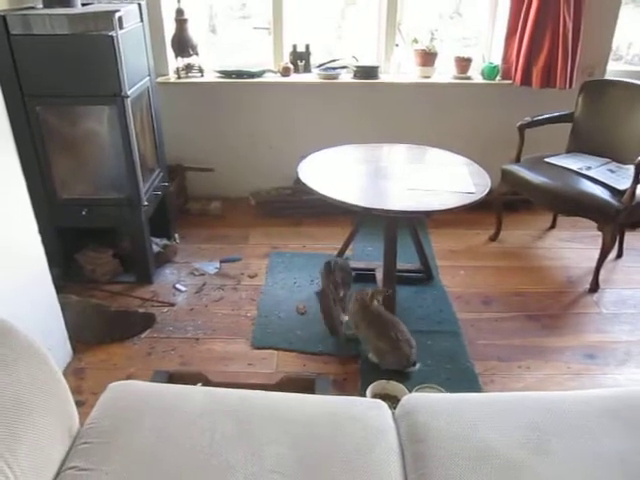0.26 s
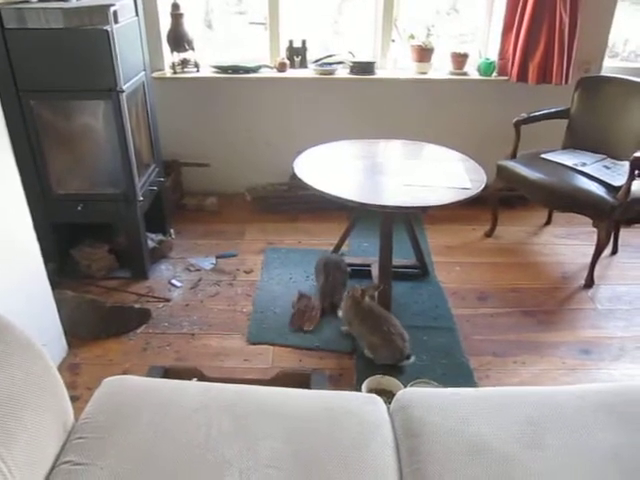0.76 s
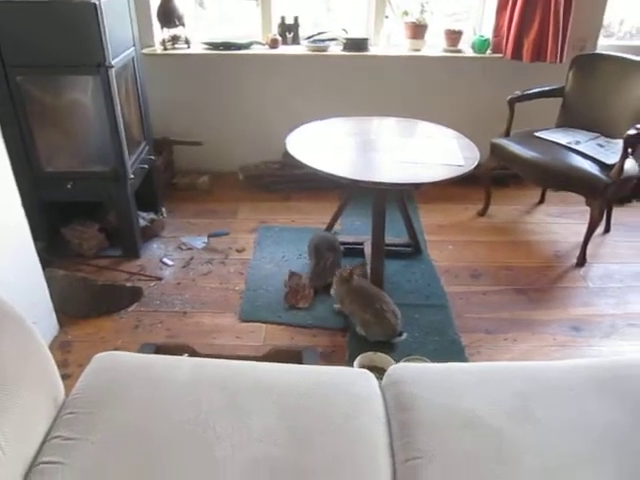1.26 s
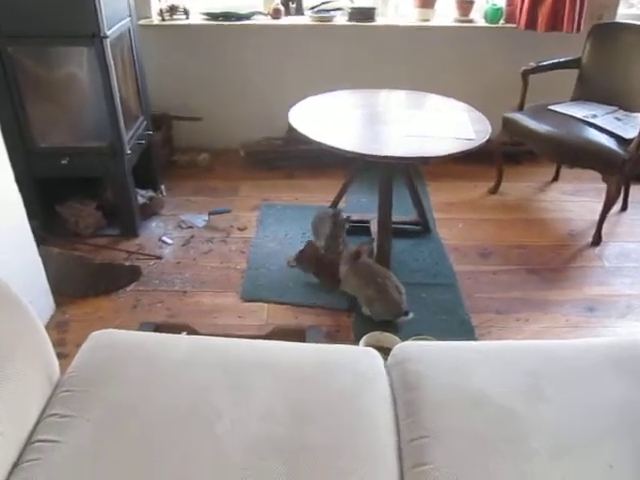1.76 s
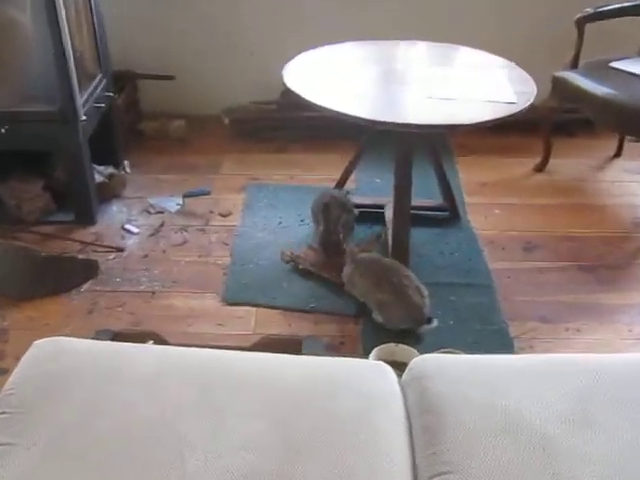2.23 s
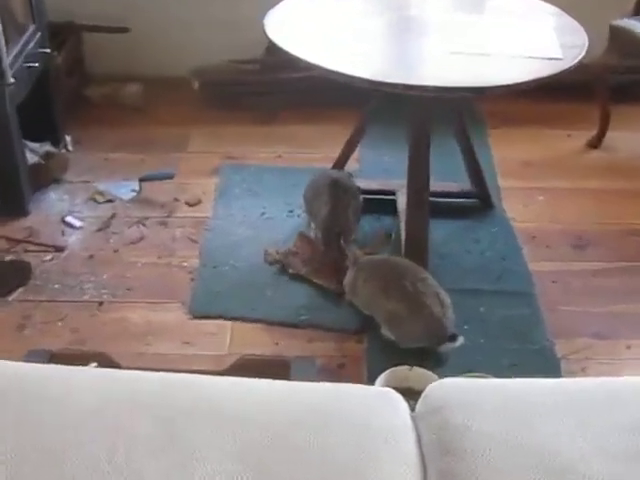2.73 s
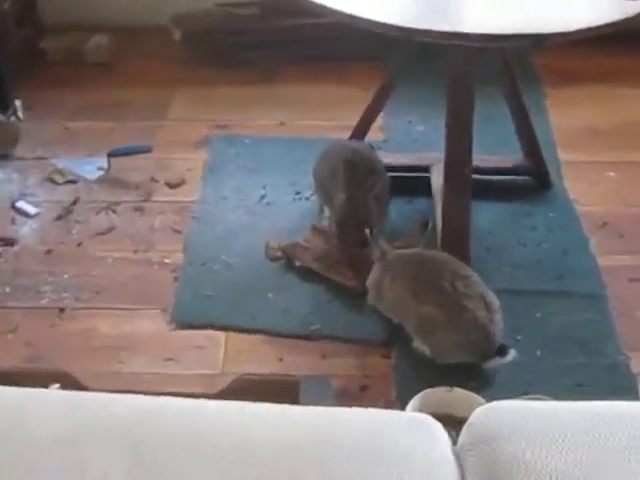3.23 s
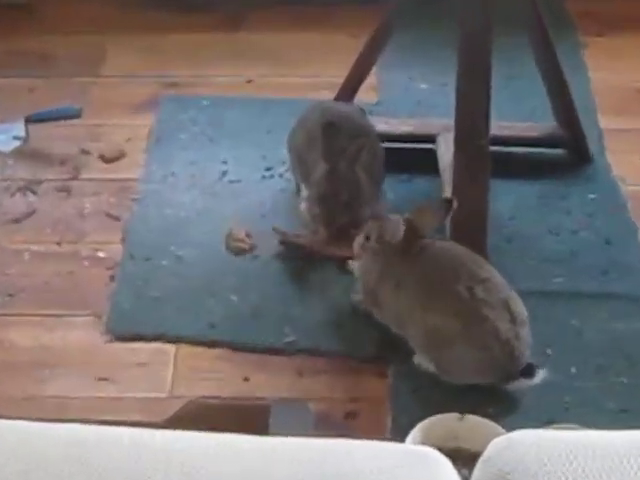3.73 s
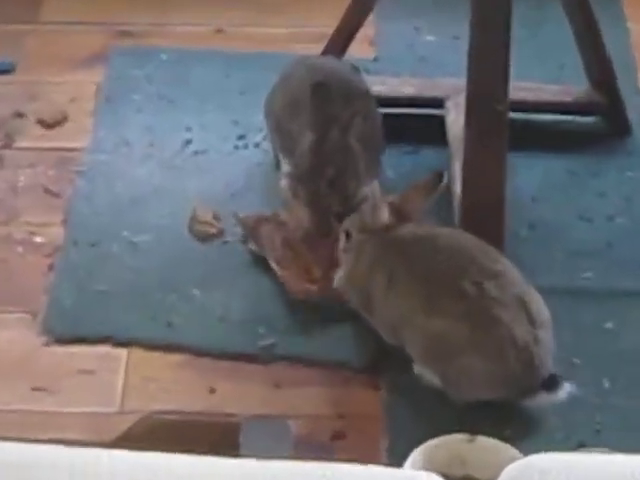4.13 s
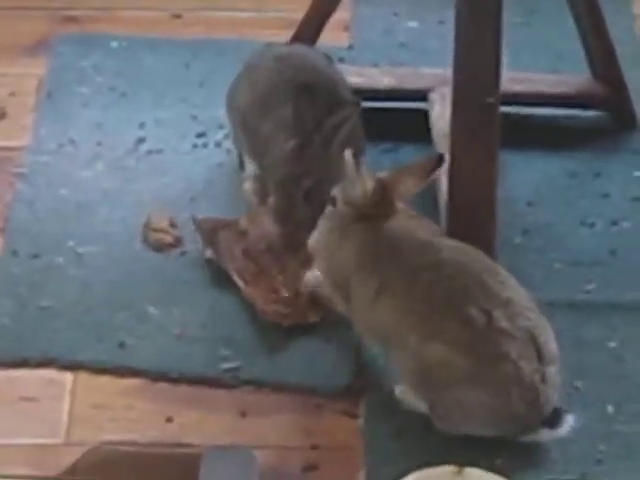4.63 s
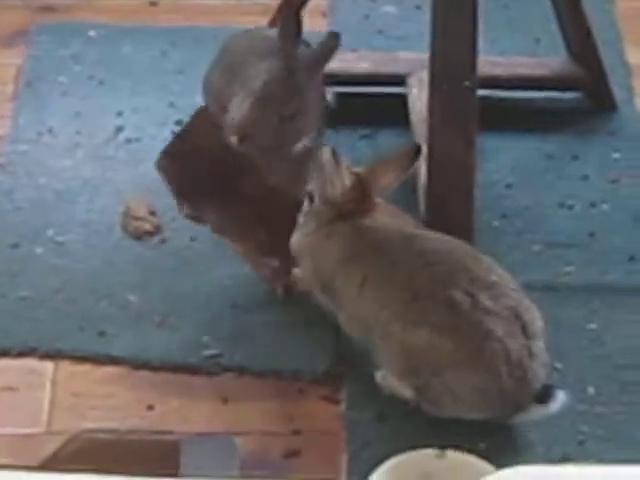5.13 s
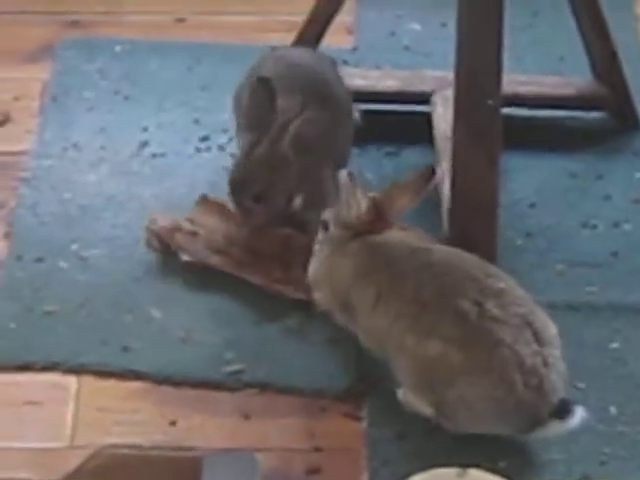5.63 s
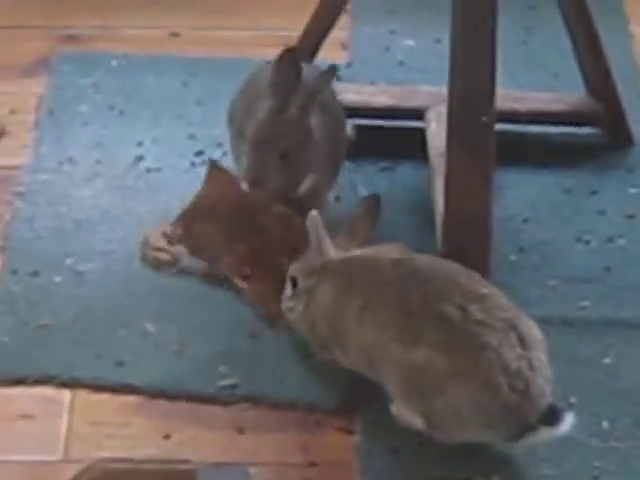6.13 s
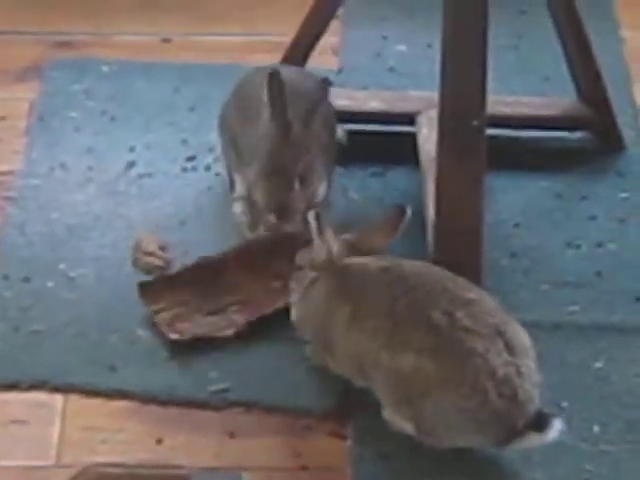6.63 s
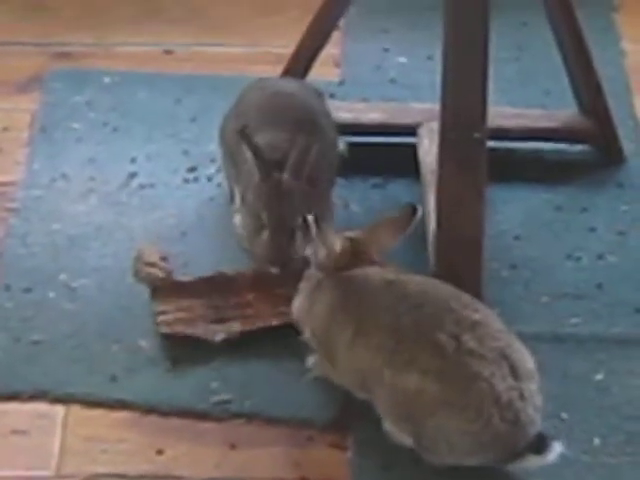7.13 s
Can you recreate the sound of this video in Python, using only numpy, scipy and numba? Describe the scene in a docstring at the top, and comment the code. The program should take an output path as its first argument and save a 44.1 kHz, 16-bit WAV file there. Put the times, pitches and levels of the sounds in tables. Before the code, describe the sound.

Rabbits gnaw and tug a dry bark-like scrap in a living room: irregular crisp cracks, soft floor thumps, and one loud click of the camera case.

```python
"""A dry, bark-like scrap cracks as two rabbits gnaw and tug at it on a rug, a few metres off in a living room.
Each crack is a burst of tiny fractures, shaped noise that rings the scrap and the room.
Paws and the dropped scrap thump the wooden floor: short pushes into decaying board modes.
The hand-held camera whines as a wavering sine, and fingers click its case as dry, ringing noise.
A low hum swells once over rumble and hiss; the hardest click makes the camera's gain control duck."""
import sys
import numpy as np
from scipy import signal
from scipy.fft import rfft, irfft, next_fast_len
from scipy.io import wavfile
from scipy.ndimage import uniform_filter1d
from numba import njit

SR = 44100
rng = np.random.default_rng(int(sys.argv[2]) if len(sys.argv) > 2 else 0)


def generate_wav(signal):
    """Clip the signal to [-1, 1] and save it as 16-bit WAV at the path in sys.argv[1]."""
    frames = np.transpose(np.atleast_2d(signal))
    scaled = np.clip(frames, -1, 1) * 32767
    pcm = np.round(scaled).astype(np.int16)
    wavfile.write(sys.argv[1], SR, pcm)


N = 325458
COUNT = 24000  # samples in one sound event
T = np.arange(COUNT) / SR


def undb(db):
    """Decibels to gain."""
    return 10 ** (np.asarray(db) / 20)


def level(x, db, span=None):
    """Scale x so that its energy, spread over span seconds (or its own length), has this level."""
    samples = span * SR if span else len(x)
    return x * undb(db) / np.sqrt(np.sum(x ** 2) / samples)


def fade(t60):
    """Exponential decay of 60 dB in t60 seconds."""
    return np.exp(-np.log(1000) * T / t60)


def along(points, hz):
    """Read (frequency [Hz], value) points on a log-frequency axis."""
    f, value = np.transpose(points)
    return np.interp(np.log(np.maximum(hz, 1)), np.log(f), value)


def colour(x, points):
    """Causal minimum-phase filter with the given (frequency [Hz], gain [dB]) outline."""
    size = 2 * next_fast_len(len(x))
    freqs = np.arange(size // 2 + 1) * SR / size
    cepstrum = irfft(np.log(undb(along(points, freqs))))
    # folding the cepstrum forward in time makes the filter causal
    cepstrum[1:size // 2] *= 2
    cepstrum[size // 2 + 1:] = 0
    return irfft(rfft(x, size) * np.exp(rfft(cepstrum)))[:len(x)]


def resonate(x, hz, width):
    """One resonance, gain 1 at its centre; width in Hz."""
    return signal.lfilter(*signal.iirpeak(hz, hz / width, fs=SR), x)


def add(track, s, sound):
    """Mix a sound into the track at time s."""
    start = int(s * SR)
    track[start:start + len(sound)] += sound[:N - start]


# reverberation of the room: (frequency [Hz], decay time t60 [s])
ROOM_DECAY = [(200, 0.62), (700, 0.5), (2300, 0.41), (6000, 0.36), (14000, 0.31)]


def room(early_db, early_t60):
    """Quick reflections from floor and furniture, then a tail that loses its treble first."""
    freqs = np.arange(COUNT // 2 + 1) * SR / COUNT
    noise = rfft(rng.standard_normal(COUNT))
    tail = 0
    for k, (_, t60) in enumerate(ROOM_DECAY):
        # overlapping bands: each is full at its own frequency and gone at its neighbours'
        share = along([(row[0], j == k) for j, row in enumerate(ROOM_DECAY)], freqs)
        tail = tail + irfft(noise * share) * fade(t60)
    sparse = rng.random(COUNT) < .08
    early = rng.standard_normal(COUNT) * sparse * fade(early_t60)
    arrival = 1 - np.exp(-T / 0.0014)
    return level(tail * arrival, 0) + level(early * arrival, early_db)


# relative colour of the steady room and microphone noise: (frequency [Hz], gain [dB])
QUIET_COLOUR = [(12, -31.5), (20, 5), (53, -4), (88, -12), (120, -15.5), (347, -23.5), (472, -26.5),
                (1030, -30), (1330, -29), (1810, -33.5), (6010, -40.5), (8410, -42), (9140, -42),
                (9950, -45), (16000, -51.5)]
QUIET_DB = -45  # mean level before the waver


def rumble_and_hiss():
    """Steady noise of room and microphone, low rumble and hiss, whose level wavers a little."""
    waver_db = level(resonate(rng.standard_normal(N), 5, 7.8), 0) * .5
    noise = colour(rng.standard_normal(N), QUIET_COLOUR)
    return level(noise, QUIET_DB) * undb(waver_db)


# thin whine of the camera: (time [s], mean frequency [Hz], peak level [dB])
WHINE_PATH = [(0, 8830, -76), (1.2, 8830, -75), (1.9, 8890, -71), (4.5, 8890, -71), (5.5, 8940, -69.5),
              (5.9, 8905, -69.5), (7.4, 8915, -69.5)]


def camera_whine():
    """A sine glides along the path while its pitch flutters at random into a narrow, unsteady band."""
    times, whine_hz, whine_db = np.transpose(WHINE_PATH)
    t = np.arange(N) / SR
    flutter_hz = 32 * level(uniform_filter1d(rng.standard_normal(N), size=120), 0)
    hz = np.interp(t, times, whine_hz) + flutter_hz
    return undb(np.interp(t, times, whine_db)) * np.sin(2 * np.pi * np.cumsum(hz) / SR)


def low_hum():
    """A faint low sine swells and fades within about half a second."""
    swell = np.hanning(COUNT) * np.sin(2 * np.pi * 199 * T)
    out = np.zeros(N)
    add(out, 3.12, level(swell, -59))
    return out


# colour of the camera body: (frequency [Hz], gain [dB])
CASE_COLOUR = [(100, -2), (300, -11), (620, -20.5), (1200, 3), (1900, 0), (2800, 2), (3700, -0.5),
               (4900, 1), (7000, -0.5), (10000, -4.5), (16000, -9.5)]
# finger clicks on the camera body, level over 5 ms, ring relative to the rattle:
# (time [s], level [dB], rattle length [s], ring frequency [Hz], ring level [dB])
FINGER_CLICKS = [(1.277, -43.5, 0.00022, 3800, -4), (1.5245, -34.5, 0.0021, 3330, 10),
                 (1.583, -34.5, 0.0048, 3940, 0), (1.6839, -23, 0.001, 3820, 26),
                 (3.9229, -28.5, .0005, 6440, -23), (3.9431, -15.5, 0.0013, 1350, -20.5),
                 (3.9446, 0.5, 0.0076, 2600, -20), (4.177, -53, 0.0011, 4200, -4),
                 (4.327, -56, 0.0027, 4800, -1), (4.354, -50.5, 0.001, 4980, -5),
                 (4.546, -49, 0.00092, 3190, 2.5)]
RELEASE_S, RELEASE_SHARE = 0.00012, 0.062  # a longer rattle takes longer to settle
FLEX_DB, FLEX_LIMIT_DB = -6.5, -26  # the case flexes with the push, up to a stop
KNOCK_HZ, KNOCK_DB, KNOCK_T60_S = 169, -5.5, 0.044  # dull knock of the flexing case


def case_flex():
    """The pushed case sways at a low pitch and gives a dull knock."""
    sway = np.sin(2 * np.pi * 55 * T) * fade(0.022)
    knock = resonate(rng.standard_normal(COUNT) * fade(KNOCK_T60_S), KNOCK_HZ, KNOCK_HZ)
    return level(sway, 0) + level(knock, KNOCK_DB)


def camera_clicks():
    """Plastic parts rattle right at the microphone: dry, with a brief ring and a slow flex of the case."""
    out = np.zeros(N)
    for s, db, length, hz, ring_db in FINGER_CLICKS:
        release = RELEASE_S + RELEASE_SHARE * length
        contact = np.exp(-np.maximum(T - length, 0) / release) + undb(-15) * fade(0.023)
        rattle = colour(contact * rng.standard_normal(COUNT), CASE_COLOUR)
        ring = resonate(rattle, hz, hz / 3)
        # a faint, duller answer comes back from the room
        answer = resonate(rng.standard_normal(COUNT) * fade(0.14), 3000, 4500)
        click = level(rattle, 0) + level(ring, ring_db) + level(answer, -25)
        flex_db = min(db + FLEX_DB, FLEX_LIMIT_DB)
        add(out, s, level(click, db, span=1 / 200) + level(case_flex(), flex_db, span=1 / 100))
    return out


# floorboard modes, detuned a little at each blow: (mean frequency [Hz], level [dB], decay time t60 [s])
BOARD_MODES = [(111, -32, 0.14), (138.2, -6, 0.37), (170.6, 5.5, 0.18), (207, 2, 0.176), (246, 0, 0.087),
               (315, -5.5, 0.37), (333.3, -4.5, 0.16)]
# soft blows on the boards, level over 50 ms: (time [s], level [dB], contact time [s])
FLOOR_THUMPS = [(.211, -31, 0.0019), (.232, -33.5, 0.0024), (.25, -39, 0.0011), (.284, -49, 0.0018),
                (0.672, -36.5, 0.0046), (1.401, -46.5, 0.0034), (1.889, -46, 0.004), (1.925, -43.5, 0.0058),
                (5.054, -52, 0.0009), (5.345, -44.5, 0.0012), (5.42, -47.5, 0.0018), (6.622, -39.5, 0.0035),
                (6.647, -43, 0.0056)]


def floorboards():
    """Paws and the falling scrap push the boards through the rug; a longer contact sounds duller."""
    out = np.zeros(N)
    # the boards radiate little below their lowest mode
    radiation = signal.butter(2, 110, "high", fs=SR, output="sos")
    for s, db, contact in FLOOR_THUMPS:
        push = np.sin(np.pi * np.minimum(T / contact, 1))
        ring = 0
        for mean_hz, mode_db, t60 in BOARD_MODES:
            hz = mean_hz * (1 + 0.032 * rng.standard_normal())
            ring = ring + undb(mode_db) * fade(t60) * np.sin(2 * np.pi * hz * T)
        blow = signal.sosfilt(radiation, signal.fftconvolve(push, ring)[:COUNT])
        echo = signal.fftconvolve(blow, room(early_db=4.5, early_t60=0.27))[:COUNT]
        add(out, s, level(level(blow, 0) + level(echo, -2), db, span=1 / 20))
    return out


def fractures(length, per_s, scatter_db):
    """Strength of a run of tiny breaks, of very unequal size, that swells and dies within length seconds."""
    count = 6 + int(per_s * length)
    place = rng.random(count)
    size = undb(scatter_db * np.minimum(rng.exponential(size=count), 3.5))
    swell = .3 + np.sin(np.pi * place)
    energy = np.zeros(COUNT)
    np.add.at(energy, (place * length * SR).astype(int), (size * swell) ** 2)
    # each break snaps for a fraction of a millisecond
    snaps = np.sqrt(signal.lfilter([1], [1, -np.exp(-1 / (0.00017 * SR))], energy + 1e-18))
    # the torn faces rub harder through the run, then on as the grip lets go
    rub = np.minimum(T / length, 1) * np.exp(-np.maximum(T - length, 0) / 0.0036)
    return np.hypot(level(snaps, 0), level(rub, -8.5))


# mean colour of a fracture: (frequency [Hz], gain [dB])
FRACTURE_COLOUR = [(150, -25), (300, -9), (500, -4.5), (800, -0.5), (1150, -0.5), (2000, 0.5), (3500, -2),
                   (6000, -2.5), (8000, -6), (10000, -16.5), (12500, -15), (16000, -28)]


def crunch(paths, db, length, body_db, air_db, ring_hz, ring_db):
    """A run of breaking fibres, heard directly and by way of the room, through one resonance of the scrap."""
    strength = fractures(length, per_s=1200, scatter_db=5.5)
    # the rough sheet radiates a different crackle in each direction, and each takes its own way round the room
    reflected = 0
    for path in paths:
        crackle = strength * rng.standard_normal(COUNT)
        reflected = reflected + signal.fftconvolve(crackle, path)[:COUNT]
    direct = strength * rng.standard_normal(COUNT)
    sound = level(reflected, 0) + level(direct, -2.5)
    sound = sound + (undb(ring_db) - 1) * resonate(sound, ring_hz, ring_hz / 4.7)
    sound = level(colour(sound, FRACTURE_COLOUR), db, span=1 / 20)
    # body weights the low and middle range, air the top
    return colour(sound, [(800, body_db), (2000, body_db), (3800, 0.0037), (7500, 0.0018), (12000, air_db)])


# modes of the whole scrap: (frequency [Hz], filter width [Hz], level [dB], decay time t60 [s])
SHEET_MODES = [(528, 84, -5, 0.25), (806, 170, -2, 0.12), (2400, 530, -4, 0.15), (6050, 760, 2, 0.21),
               (7160, 1400, 4.5, 0.1)]


def sheet_ring(db):
    """A clean snap rings the stiff sheet; the room blurs each mode into a narrow band."""
    ring = 0
    for hz, width, mode_db, t60 in SHEET_MODES:
        burst = rng.standard_normal(COUNT) * fade(t60)
        band = resonate(resonate(burst, hz, width), hz, width)
        ring = ring + level(band, mode_db)
    return level(ring, db, span=1 / 20)


# In the next three tables level is over 50 ms, before the body and air tilt.
# teeth break the edge of the scrap:
# (time [s], level [dB], length [s], body [dB], air [dB])
EDGE_BITES = [(0.03, -48, 0.0052, -4, 13.5), (0.208, -42.5, 0.0035, -3.5, 4), (0.608, -49, 0.016, -13, 3),
              (0.623, -40, 0.016, -10.5, -12), (1.269, -50, 0.09, 2.5, 5), (1.357, -42.5, 0.079, -4.5, 3),
              (1.445, -52, 0.07, -1, 11), (1.643, -54, 0.046, 4.5, 11), (1.725, -41.5, 0.0044, -13, 1),
              (1.858, -37.5, 0.014, -5.5, -2), (1.883, -45, 0.015, 1, -6), (2.023, -47.5, 0.022, -1, 0),
              (2.675, -37.5, 0.0023, -5, 9), (2.769, -53.5, 0.015, 0.5, 0), (2.929, -56, 0.025, -5, -6),
              (3.163, -55, 0.021, 1, -3), (3.454, -47, 0.015, 1.5, 0), (3.536, -47, 0.13, -1.5, 3.5),
              (4.565, -52, 0.0062, -4, 1), (5.238, -56, 0.0056, -17, -19), (5.35, -41, 0.009, -1.5, 2),
              (5.433, -45.5, 0.011, 0, 1), (5.577, -57, 0.006, -7, -1), (5.933, -56, 0.09, -2, -2),
              (6.409, -53.5, 0.0056, -9, 7), (6.486, -51, 0.013, -5, 7), (6.501, -38.5, 0.007, -7.5, -2),
              (6.586, -47, 0.014, -3, 1), (6.601, -38, 0.018, -2.5, 2), (6.764, -57, 0.0043, -14, -3)]
BITE_HZ, BITE_RING_DB = 4740, 3  # the short edge held in the teeth rings high
# the scrap is tugged and dragged:
# (time [s], level [dB], length [s], body [dB], air [dB], rasp frequency [Hz], rasp gain [dB])
SCRAP_TUGS = [(0.046, -35.5, 0.014, -10.5, -1, 1920, 11), (0.076, -32, 0.029, -9.5, 5, 1950, 12),
              (0.129, -30, 0.013, -15, 7.5, 1940, 10.5), (0.75, -47, 0.051, 2, 1, 600, 5),
              (0.863, -48.5, 0.011, -2.5, 5, 1560, 9.5), (1.47, -51.5, 0.0092, 10.5, -3, 1510, 0),
              (1.824, -52, 0.0073, -0.5, 2, 1300, 8), (2.483, -61, 0.033, 8.5, -10, 940, 26),
              (3.783, -54, 0.028, -0.5, -4, 2190, 6), (4.646, -41.5, 0.014, -1, -6, 1680, 4),
              (4.671, -35, 0.05, -2, -4, 1660, 13.5), (4.745, -30, 0.022, 1.5, -13, 1780, 8.5),
              (4.853, -40, 0.026, 1, -2, 1030, 6), (4.945, -26, 0.04, -0.5, -6, 1520, 4),
              (5.049, -45.5, 0.021, 6, -14, 443, 6), (5.302, -49, 0.017, -2.5, -3, 1190, 6),
              (6.028, -48, 0.022, -6, 5, 1850, 6.5), (6.338, -58.5, 0.0074, 6, -6, 1070, 7)]
# the scrap snaps or slaps down: (time [s], level [dB], length [s], body [dB], air [dB],
# strongest ring frequency [Hz], ring gain [dB], level of all sheet modes [dB])
SCRAP_SNAPS = [(0.666, -29, 0.012, 0.5, 4.5, 550, 11, -40), (2.537, -30, 0.0024, -3, 9, 2400, 7.5, -32.5),
               (3.381, -29.5, 0.0031, -3, 0, 505, 10.5, -55), (5.373, -32, 0.009, -2, 4.5, 3380, 5, -50)]


def scrap():
    """Each bite, tug or snap breaks fibres; the grip decides which resonance of the scrap answers."""
    out = np.zeros(N)
    paths = [room(early_db=1, early_t60=.085) for _ in range(4)]
    for s, db, length, body_db, air_db in EDGE_BITES:
        add(out, s, crunch(paths, db, length, body_db, air_db, BITE_HZ, BITE_RING_DB))
    for s, db, length, body_db, air_db, rasp_hz, rasp_db in SCRAP_TUGS:
        add(out, s, crunch(paths, db, length, body_db, air_db, rasp_hz, rasp_db))
    for s, db, length, body_db, air_db, ring_hz, ring_db, modes_db in SCRAP_SNAPS:
        snap = crunch(paths, db, length, body_db, air_db, ring_hz, ring_db)
        add(out, s, snap + sheet_ring(modes_db))
    return out


def scene():
    """Everything that reaches the one microphone."""
    background = rumble_and_hiss() + camera_whine() + low_hum()
    return (background + camera_clicks() + floorboards() + scrap())[None]


@njit
def gain_control(power, limit_db, attack_s, recover_db_per_s):
    """Turn down quickly when the sound passes the limit, then creep back up."""
    cut, out = 0., np.empty(len(power))
    for i in range(len(power)):
        excess = 10 * np.log10(power[i] + 1e-12) - limit_db
        if excess > cut:
            cut += (excess - cut) / (attack_s * SR)
        else:
            cut = max(cut - recover_db_per_s / SR, 0.)
        out[i] = -cut
    return out


def record(dry):
    """Gain control, soft overload and the treble cut-off."""
    power = np.abs(uniform_filter1d(dry[0] ** 2, size=44))  # averaged over 1 ms
    gain_db = gain_control(power, limit_db=-18.5, attack_s=0.0036, recover_db_per_s=14.0)
    ceiling = .8
    sound = ceiling * np.tanh(dry * undb(gain_db) / ceiling)
    treble_cut = signal.ellip(8, .2, 70, 16100, fs=SR, output="sos")
    return signal.sosfilt(treble_cut, sound)


dry = scene()
out = record(dry)
generate_wav(out)
```